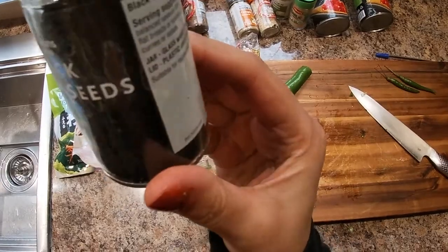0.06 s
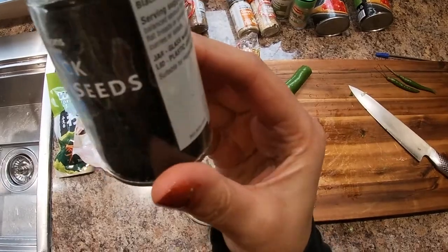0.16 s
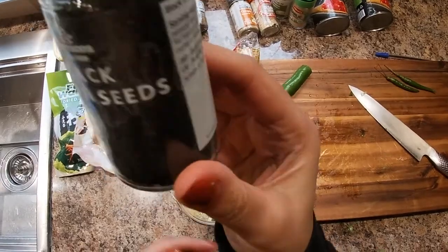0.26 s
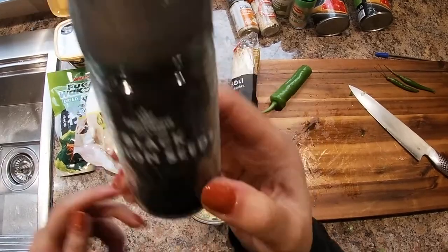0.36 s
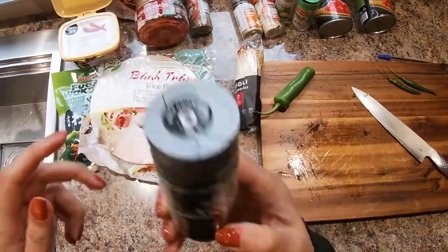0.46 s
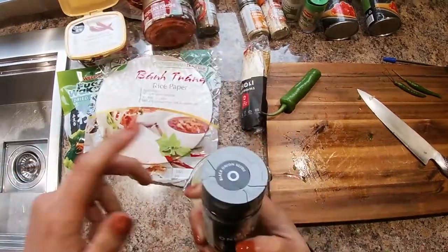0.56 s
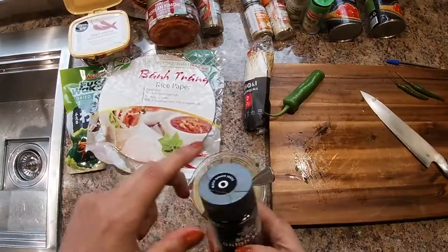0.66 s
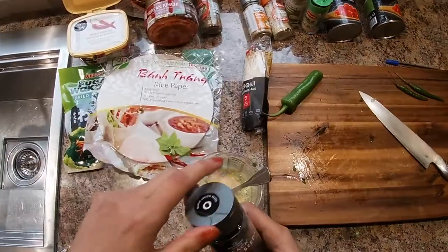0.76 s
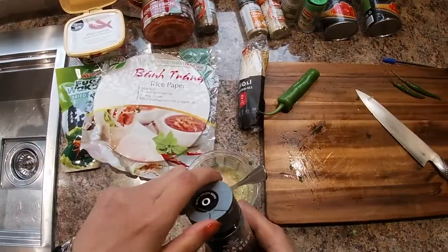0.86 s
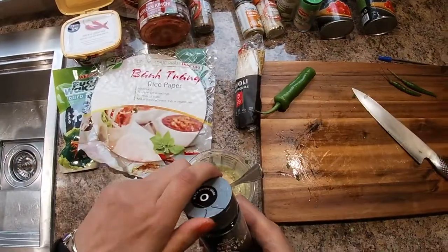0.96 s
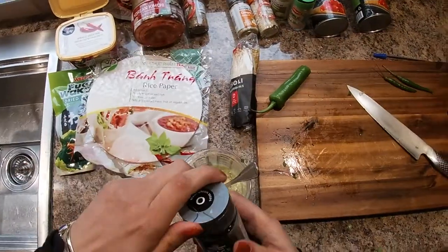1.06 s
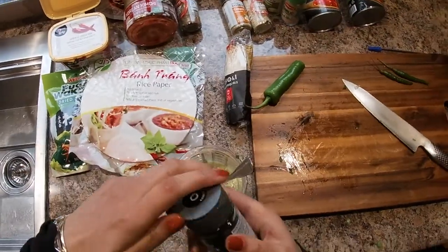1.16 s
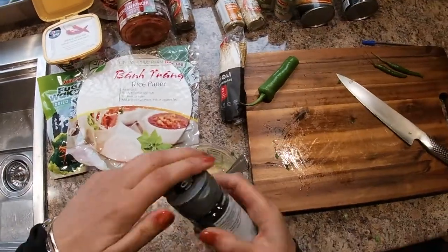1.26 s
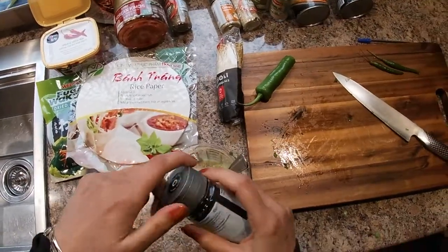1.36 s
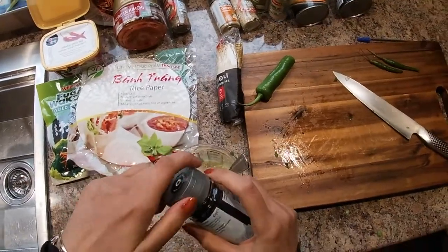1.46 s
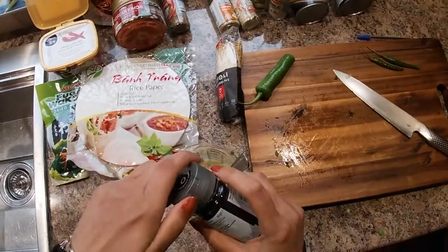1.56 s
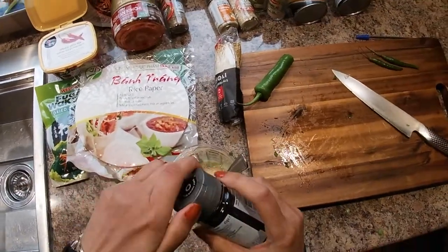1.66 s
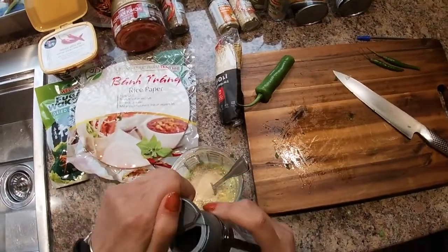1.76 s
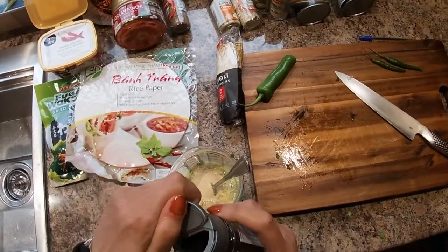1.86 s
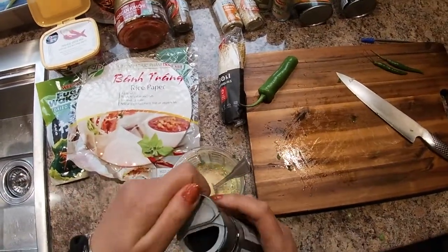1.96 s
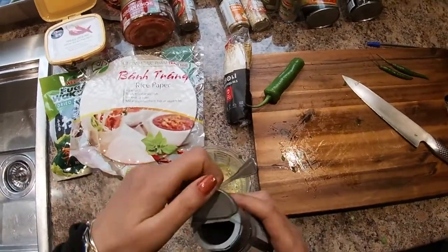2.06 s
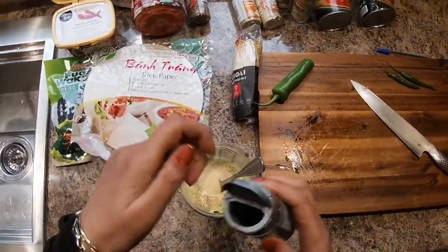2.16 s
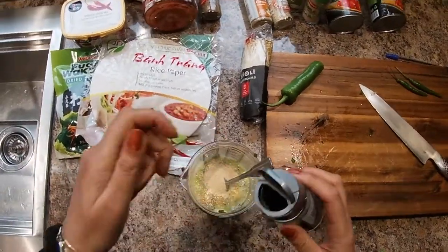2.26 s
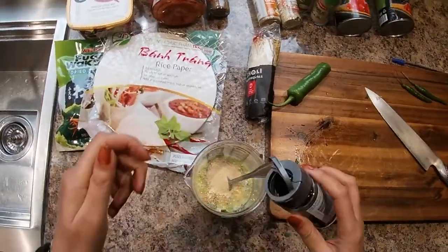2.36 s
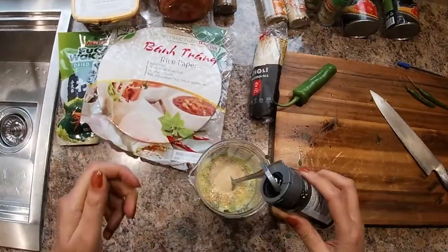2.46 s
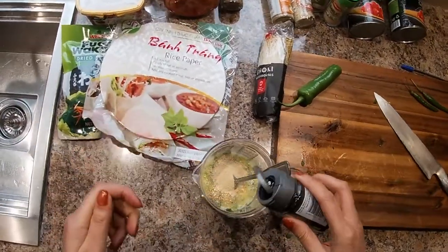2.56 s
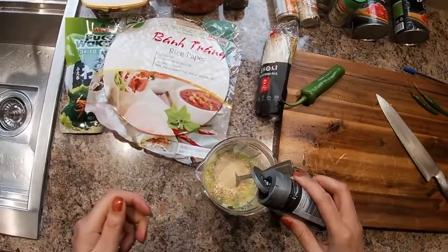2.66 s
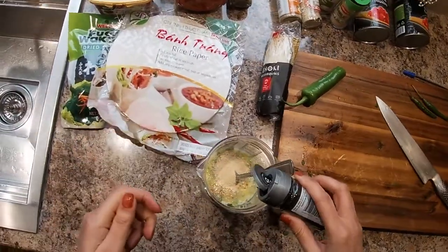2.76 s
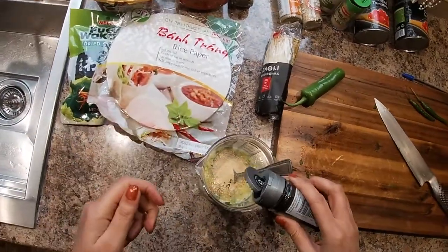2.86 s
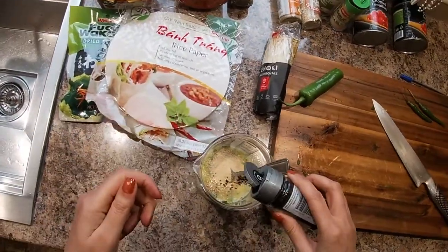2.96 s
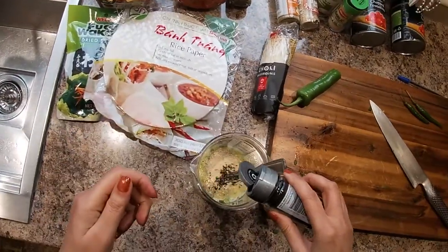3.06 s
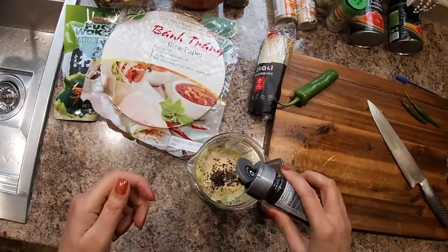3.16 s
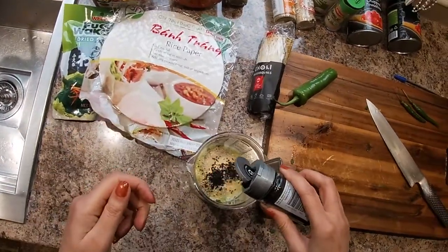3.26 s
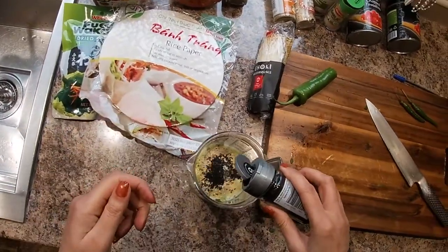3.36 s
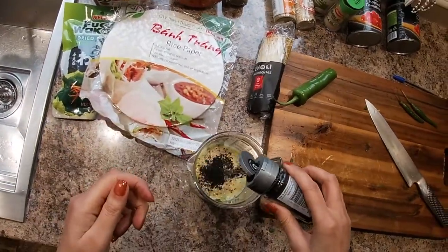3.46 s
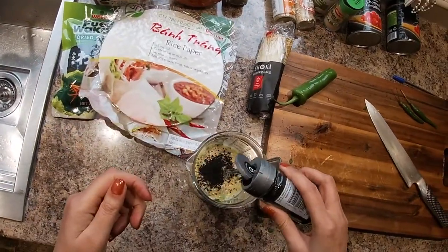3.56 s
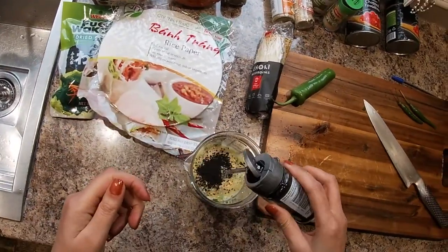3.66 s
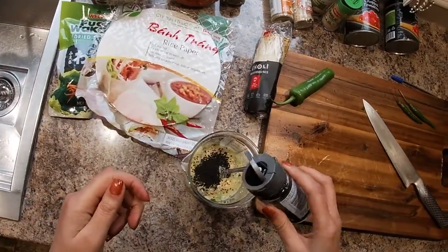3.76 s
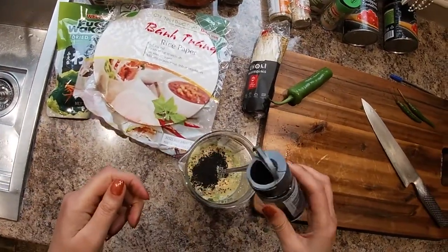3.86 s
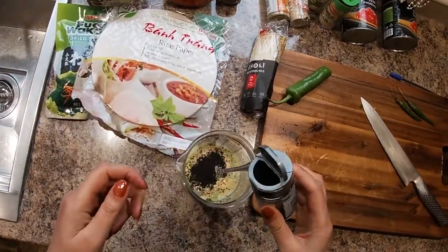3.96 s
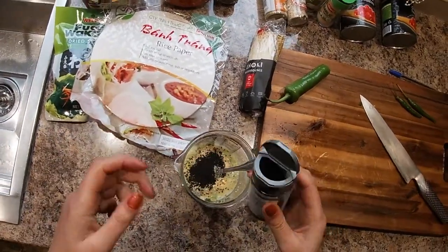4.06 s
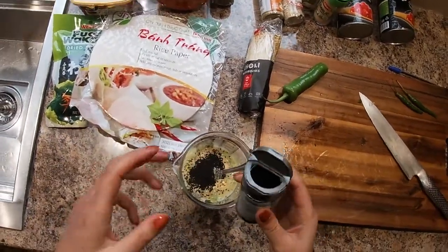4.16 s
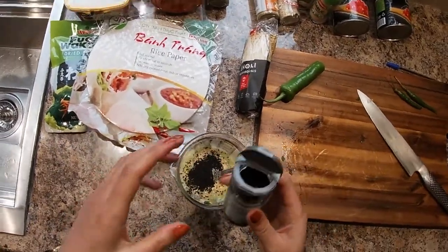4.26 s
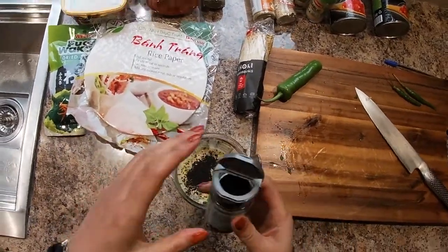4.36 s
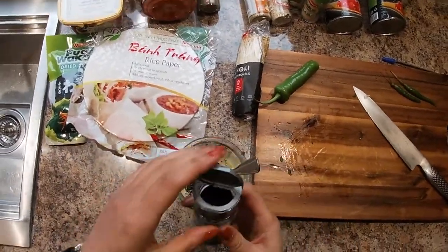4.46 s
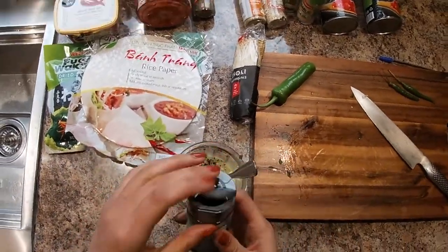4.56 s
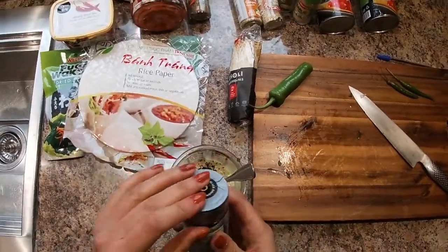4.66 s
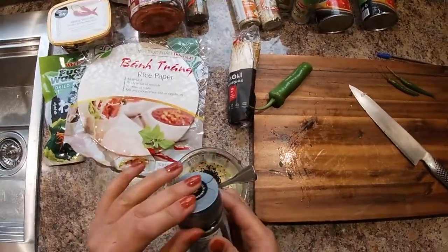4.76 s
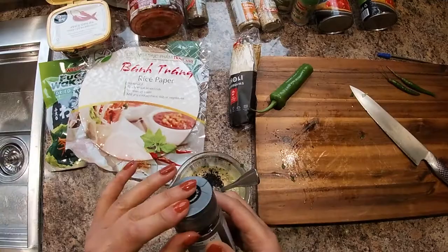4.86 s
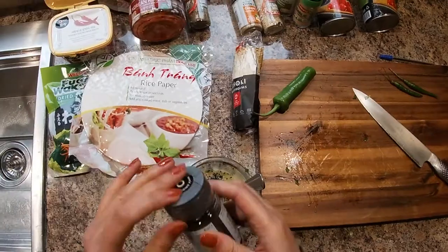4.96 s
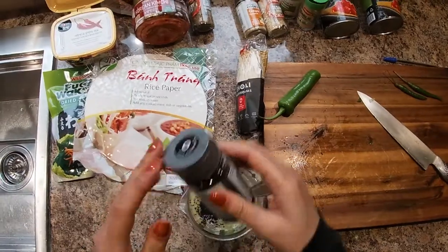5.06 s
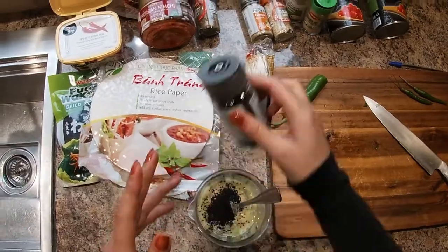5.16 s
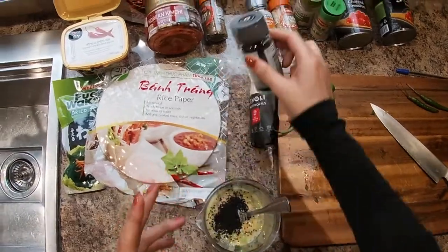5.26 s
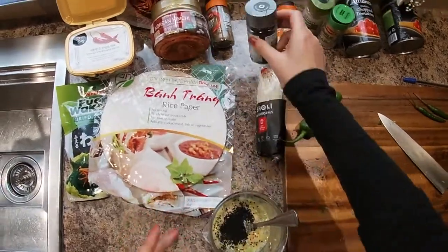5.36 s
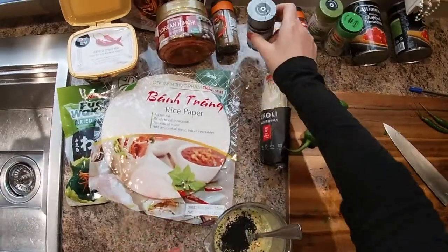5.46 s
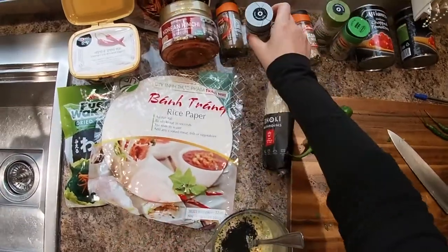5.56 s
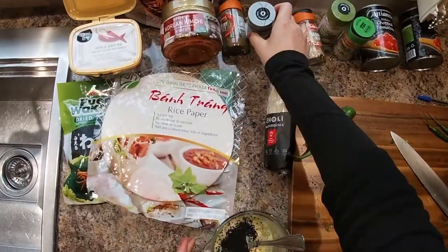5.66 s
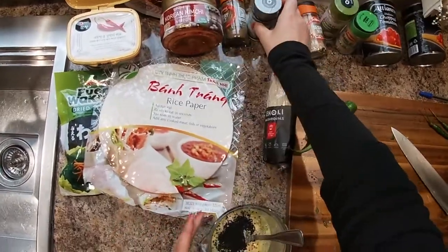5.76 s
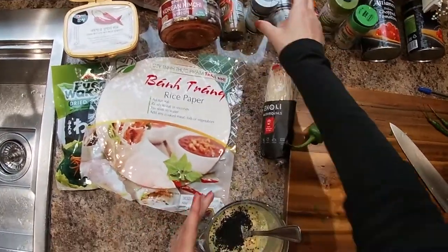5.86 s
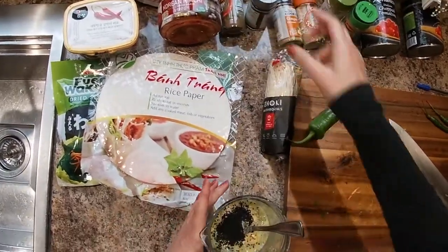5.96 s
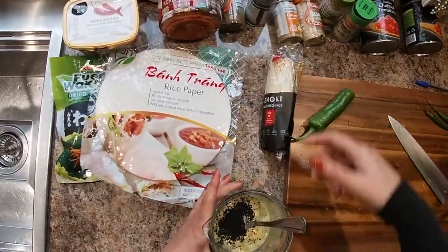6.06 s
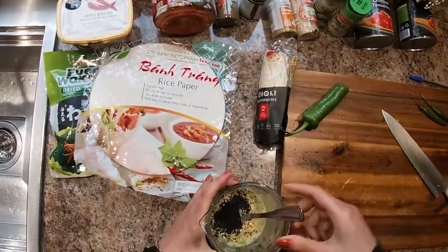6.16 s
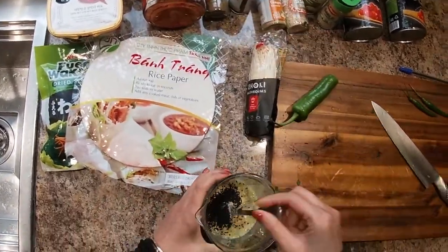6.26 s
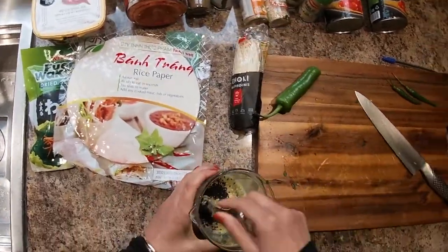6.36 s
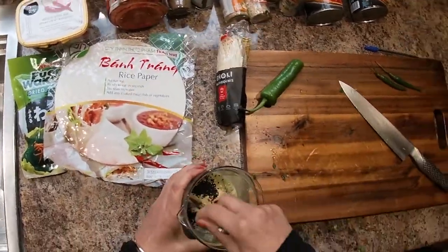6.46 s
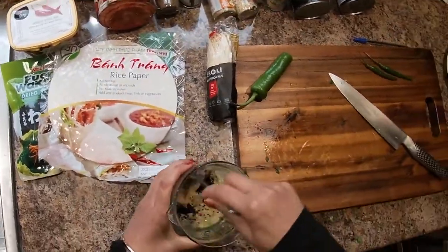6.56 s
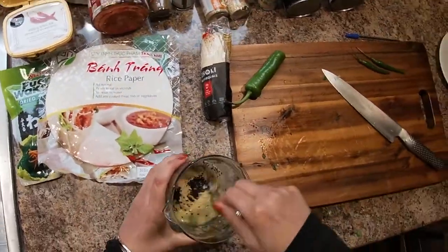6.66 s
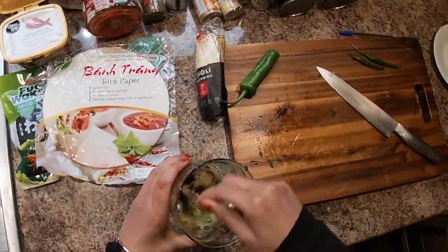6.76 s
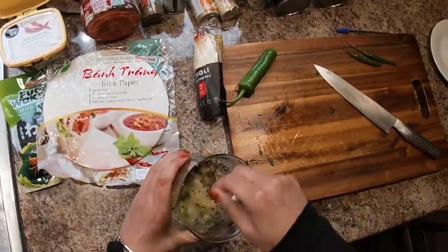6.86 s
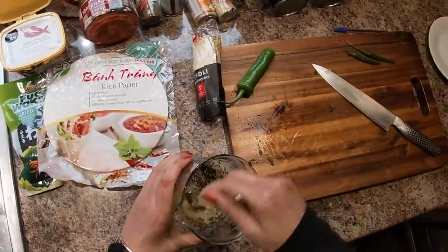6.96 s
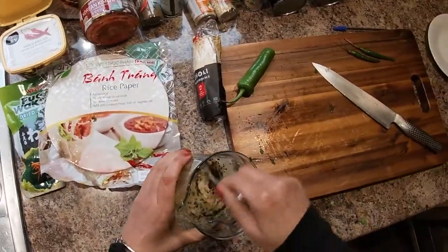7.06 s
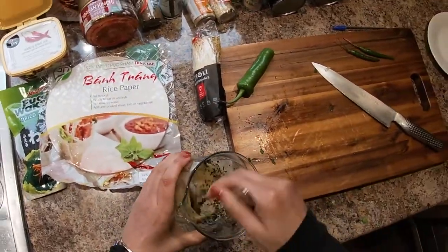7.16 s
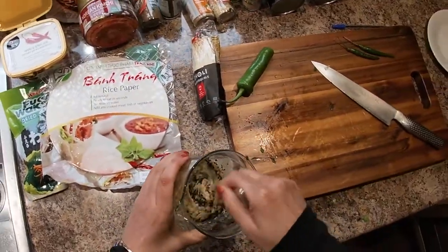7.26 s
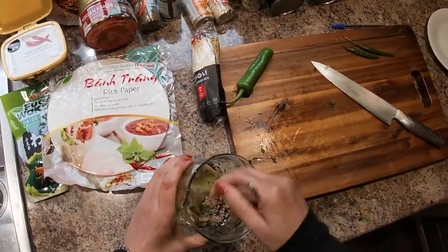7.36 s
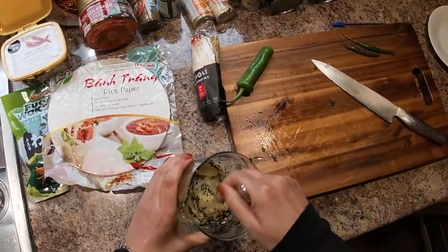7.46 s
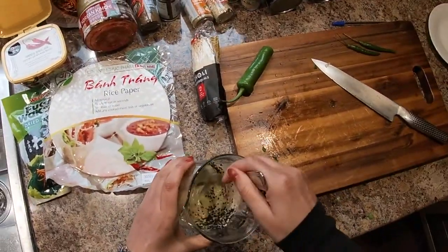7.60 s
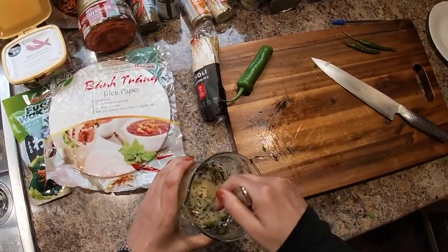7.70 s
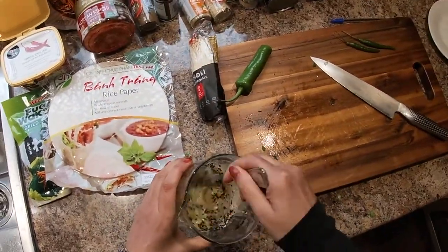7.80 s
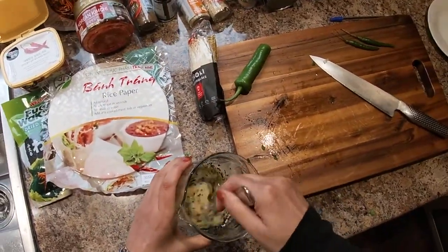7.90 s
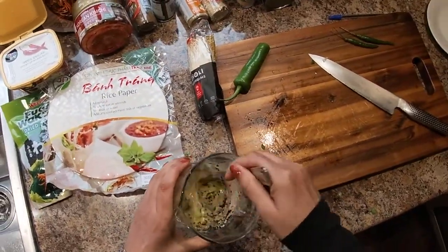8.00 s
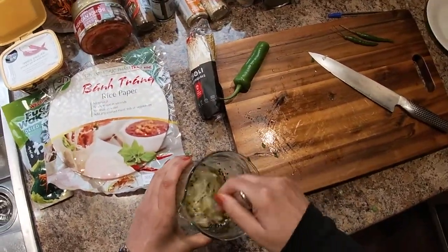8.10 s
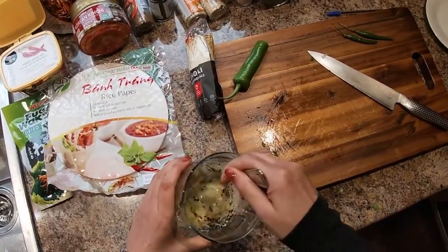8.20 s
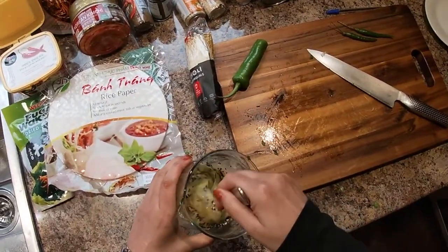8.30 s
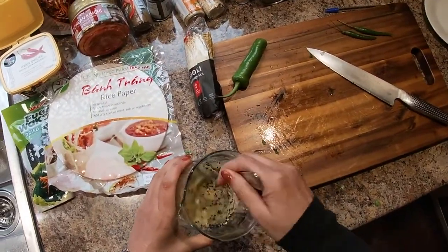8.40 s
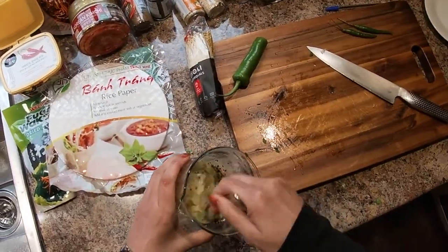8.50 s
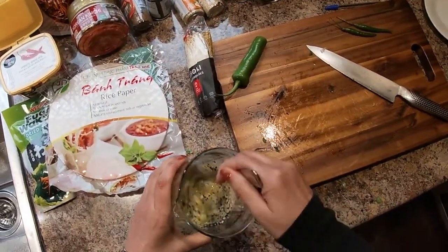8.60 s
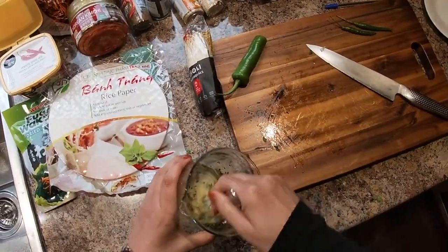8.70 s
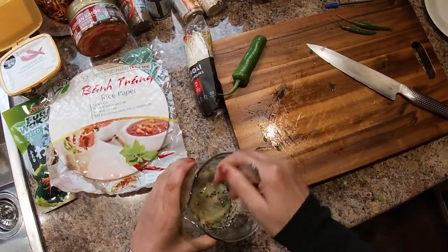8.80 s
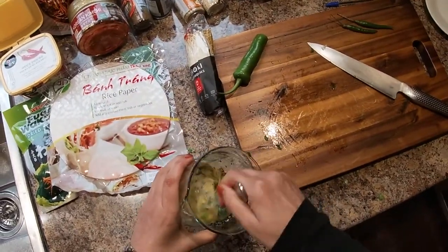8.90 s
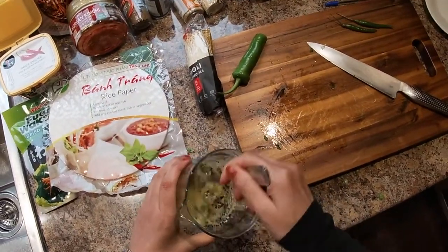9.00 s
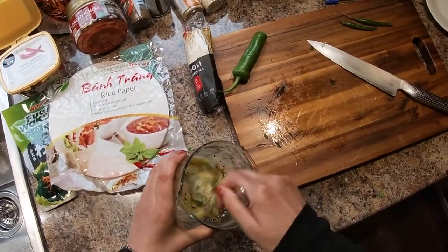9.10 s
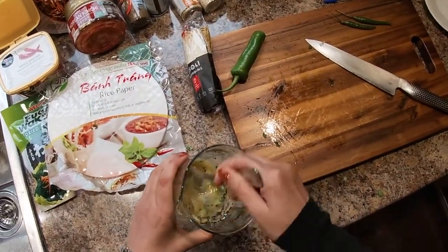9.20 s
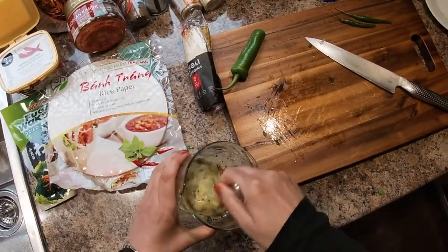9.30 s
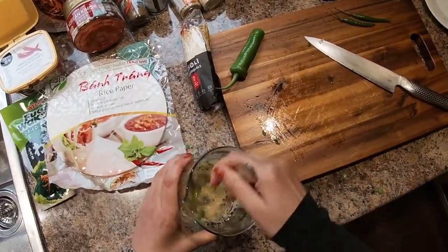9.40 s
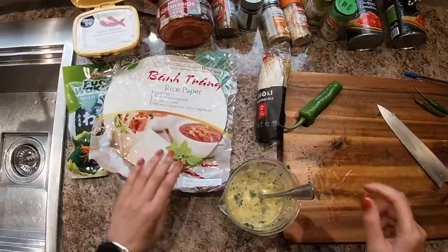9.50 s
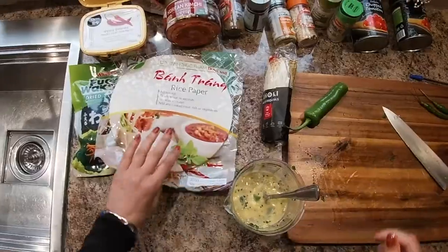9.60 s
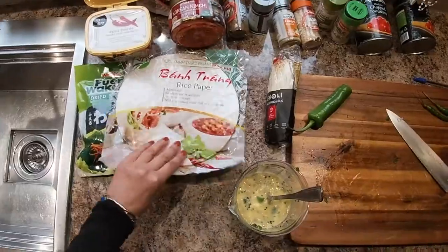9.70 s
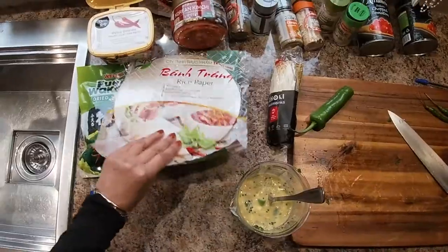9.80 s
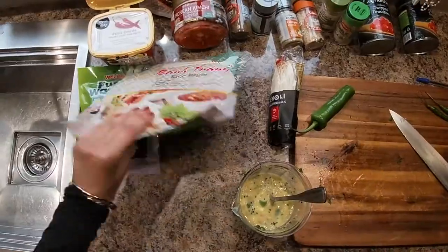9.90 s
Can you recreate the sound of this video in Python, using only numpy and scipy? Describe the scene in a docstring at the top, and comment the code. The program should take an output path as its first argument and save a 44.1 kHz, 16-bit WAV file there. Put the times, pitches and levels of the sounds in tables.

```python
"""A metal spoon beats a gulping egg mixture in a small glass bowl: struck modes of hollow, wall and steel,
filtered tiny slips for the rubbing, tones of rising pitch for air pockets. Before that, close up, a spice jar's
flip lid pops (noise bursts and modes), seeds trickle in (a tick each), the lid snaps and the jar is put back.
At the end something hard clacks down with a short rattle. Fingers rub, thin squeaks slide, a fridge hums,
the room rings (decaying noise), and gain control ducks after the loudest peaks."""
import sys
import numpy as np
from scipy import signal
from scipy.fft import rfft, irfft, next_fast_len
from scipy.io import wavfile
from scipy.ndimage import uniform_filter1d, minimum_filter1d, map_coordinates

SR = 44100
rng = np.random.default_rng(int(sys.argv[2]) if len(sys.argv) > 2 else 0)


def transcribe(u):
    """Save the signal u as a 16-bit wav file named by the first command-line argument.

    u: samples, shape (n,) or (channels, n), limited to [-1, 1]; the rate is SR.
    q: integer samples, one column per channel.
    """
    v = np.clip(np.atleast_2d(u).T, -1, 1)
    q = np.round(v * 32767).astype(np.int16)
    wavfile.write(sys.argv[1], SR, q)


N = 438354
CLOCK = np.arange(N) / SR
AGE = np.arange(SR // 4) / SR  # time since a contact, s

# spoon blows: [t/s, hollow level/dB, glass wall level/dB, steel level/dB, tip tick level/dB, wall f/Hz, steel f/Hz]
SPOON_BLOWS = [(6.3398, -42, -60.5, -73, -86, 1760, 6270), (6.3757, -56.5, -75, -69.5, -81, 1870, 5650),
               (6.5177, -44.5, -59, -68.0, -87, 1910, 4940), (6.6068, -66, -55, -57, -76, 3140, 3570),
               (6.6305, -38, -39.5, -40.0, -59.5, 2690, 3610), (6.6698, -44, -44.5, -46.5, -66, 2830, 3460),
               (6.7315, -30.5, -31.0, -27, -48.5, 2286, 4040), (6.8093, -41.5, -37, -46, -67, 2870, 5100),
               (6.8488, -39.0, -57, -50, -82, 2440, 5430), (7.0306, -50, -37.5, -44.5, -59, 2560, 3810),
               (7.107, -29, -19.5, -23.5, -38.5, 2330, 4680), (7.3713, -45.5, -41, -48, -61, 1820, 3470),
               (7.4182, -43.5, -45.5, -50, -69, 2470, 3690), (7.5172, -46, -48.5, -49.0, -64, 2770, 4020),
               (7.5442, -45, -33, -37, -43.5, 1740, 4740), (7.7178, -47, -44.5, -48, -62, 2255, 5330),
               (7.7442, -36, -44.0, -45.5, -52.5, 1829, 5790), (7.8092, -45.5, -50, -48, -74, 2500, 4880),
               (7.8937, -46.5, -50.5, -52, -60, 1520, 4070), (7.9246, -47.5, -49.5, -47.0, -57, 2330, 4590),
               (8.0632, -49, -46.5, -43.5, -52, 2310, 5470), (8.0992, -11, -17, -17.5, -25, 2280, 4590),
               (8.5335, -42, -40, -41, -49.5, 2925, 5490), (8.6538, -62, -44, -49, -55, 2690, 5350),
               (8.723, -32.5, -29.5, -26.5, -36.5, 2285, 5050),
               (8.7602, -36.5, -43.5, -48, -39, 2270, 5480), (8.7986, -43.5, -51.5, -47, -55, 2330, 5190),
               (8.8662, -43, -45, -45, -52, 2070, 4880), (8.9268, -30.5, -29.5, -26, -31.5, 2360, 4590),
               (8.9599, -44, -42, -50, -47, 2540, 5160), (9.0408, -50, -44, -48.0, -53.5, 2800, 3400),
               (9.1029, -52, -52, -48, -63, 1807, 3350), (9.1364, -27, -26, -25.5, -30.5, 1710, 4760),
               (9.1632, -49.5, -37, -37.5, -44.5, 1930, 5670), (9.2806, -55, -41.0, -47, -48, 2120, 5520),
               (9.3349, -30, -26, -23, -32, 2095, 4070), (9.3556, -36.5, -38.5, -40.5, -49, 1867, 5360),
               (9.3722, -35.5, -31.5, -25.0, -34, 2030, 4350)]
# spectrum of steel skidding on glass, also of the wet crackle: [f/Hz, level/dB]
CONTACT_SPECTRUM = [(100, -21.5), (250, 21.5), (450, 5), (900, 2.5), (1400, 9), (2000, 17), (3500, 12.5),
                    (5200, 12.5), (6600, 1), (7800, 0), (9000, -1), (10000, -11.5), (12000, -8.5),
                    (13500, -17), (16000, -52.5)]
# clumps of seeds landing: [t/s, level/dB, treble tilt/dB]
SEED_CLUMPS = [(2.89, -61, -13), (2.998, -57, -6.5), (3.009, -65, -6), (3.110, -61.5, -3),
               (3.139, -58.5, -7), (3.177, -63, -12), (3.267, -62, 2), (3.374, -62, 2), (3.417, -65, 7),
               (3.516, -58.5, -3), (3.535, -58, -4), (3.602, -68, -4), (3.625, -66, 3), (3.668, -61, -4),
               (3.785, -62, 5)]
STIR_START_S, STIR_STOP_S = 7.2, 9.45
SLIDE_PEAK_S, SLIDE_FALL_S = 3.768, 0.53  # jar righted, seeds slide back; fall is a 1/e time


def amp(db):
    """Decibels to gain."""
    return 10 ** (np.asarray(db) / 20)


def unit(x):
    """Scale to rms 1."""
    return x / np.sqrt(np.mean(x ** 2) + 1e-20)


def blow(x):
    """Scale a hit to the energy of 20 ms at rms 1."""
    return x * np.sqrt(.02 * SR / np.sum(x ** 2))


def along(points, hz):
    """Interpolate (Hz, value) points on a log frequency axis."""
    f, v = np.transpose(points)
    return np.interp(np.log(hz + 1), np.log(f + 1), v)


def add(track, s, x):
    """Mix x into the track at time s."""
    start = round(s * SR)
    track[start:start + len(x)] += x[:N - start]


def colour(x, points, size=4096):
    """Minimum-phase filter (folded cepstrum) with the gain of (Hz, dB) points."""
    cepstrum = irfft(np.log(amp(along(points, np.fft.rfftfreq(size, 1 / SR)))))
    cepstrum[1:size // 2] *= 2
    cepstrum[size // 2 + 1:] = 0
    response = irfft(np.exp(rfft(cepstrum)))
    return signal.fftconvolve(x, response)[:len(x)]


def brighter(points, bright_db):
    """The same spectrum with its treble raised or lowered."""
    return [(hz, db + along([(2000, 0), (7000, bright_db)], hz)) for hz, db in points]


def wobble(rate, count=2000):
    """Smooth random curve with rate knots per second."""
    return map_coordinates(rng.standard_normal(count), [CLOCK * rate], mode="wrap")


def swell(peak_s, rise_s, fall_s):
    """Gaussian rise and fall around a peak; the times reach 1/e."""
    since = CLOCK - peak_s
    return np.exp(-(since / np.where(since < 0, rise_s, fall_s)) ** 2)


def ring(modes, scatter_db, detune=0., age=AGE):
    """Damped modes; each contact point draws new strengths, signs and slightly new pitches."""
    hz, db, t60 = np.transpose(modes)[:, :, None]
    hz = hz * np.exp(detune * rng.standard_normal(hz.shape))
    sign = rng.choice([-1, 1], hz.shape)
    strength = sign * amp(db + scatter_db * rng.standard_normal(hz.shape))
    return np.sum(strength * amp(-60 * age / t60) * np.sin(2 * np.pi * hz * age), axis=0)


def knock(spectrum, t60, rattle_db):
    """One sharp push plus a dense, dying rattle of noise."""
    rattle = blow(rng.standard_normal(len(AGE)) * amp(-60 * AGE / t60))
    push = blow(1.0 * (AGE == 0))
    return blow(colour(amp(rattle_db) * rattle + push, spectrum))


def grains(rate, spread_db):
    """Random tiny impacts, rate per second, of unequal size, rms 1."""
    chance, size, sign = rng.random(N), rng.standard_normal(N), rng.choice([-1, 1], N)
    return unit((chance < rate / SR) * sign * amp(spread_db * np.clip(size, -2, 2)))


def even(x, fine_hz, broad_hz):
    """Level out chance spectral peaks and holes, keeping the broad colour."""
    size = next_fast_len(2 * len(x))
    z = rfft(x, size)
    power = np.abs(z) ** 2
    fine, broad = [np.abs(uniform_filter1d(power, size=round(hz * size / SR))) + 1e-20
                   for hz in (fine_hz, broad_hz)]
    return irfft(z * np.sqrt(broad / fine), size)[:len(x)]


def kitchen(x, wet_db, build=0.00038, linger=1):
    """x plus a diffuse room tail: noise that builds up and decays at each frequency's own speed."""
    # room decay: [f/Hz, t60/s]
    room_t60 = [(150, 0.45), (400, 0.71), (1000, 0.72), (2800, 0.58), (5000, 0.53), (8000, 0.51),
                (13000, 0.27)]
    # room colour: [f/Hz, level/dB]
    room_tone = [(80, -13.5), (190, 2.5), (250, 9), (320, 8.5), (500, -1.5), (1000, 4), (3000, 1.5),
                 (8000, 6.5), (13000, 6)]
    hz, t, z = signal.stft(rng.standard_normal(3 * SR // 4), SR, nperseg=256)
    decay_db = -60 * t / linger / along(room_t60, hz)[:, None]
    shape = amp(along(room_tone, hz)[:, None] + decay_db)
    tail = signal.istft(z * shape, SR, nperseg=256)[1]
    tail *= (1 - np.exp(-np.arange(len(tail)) / SR / build)) ** 2
    tail = even(tail, fine_hz=40, broad_hz=300)
    response = amp(wet_db) * tail / np.linalg.norm(tail)
    response[0] = 1  # direct sound
    return signal.fftconvolve(x, response)


def beating():
    """Blows, grazes, rubbing and air pockets; at the stop the sound turns dull within 15 ms."""
    sound = spoon() + taps() + stirring() + plops()
    dull = colour(sound, [(900, 5.0), (1400, -3.0), (2200, -11.5), (5000, -23.0), (9000, -25.0)])
    bright = np.clip((STIR_STOP_S - CLOCK) / 0.015 + .5, 0, 1)
    return bright * sound + (1 - bright) * dull


def spoon():
    """Firm blows of the spoon against the bowl."""
    out = np.zeros(N)
    for s, *levels_db, wall_hz, steel_hz in SPOON_BLOWS:
        add(out, s, strike(levels_db=levels_db, s=s, wall_hz=wall_hz, steel_hz=steel_hz))
    return out


def strike(s, levels_db, wall_hz, steel_hz):
    """One contact rings hollow, glass wall and steel; where they meet decides which pitches stand out."""
    # bowl's hollow: [f/Hz, level/dB, t60/s]
    hollow_modes = [(462, -8.5, 0.085), (629, -4, 0.039), (723.5, 7, 0.044), (910, -22, 0.021),
                    (1000, -21, 0.0084)]
    # glass wall with the spoon against it: [f/Hz, level/dB, t60/s]
    wall_modes = [(1906, -7, 0.048), (2210, -9.5, 0.011), (2312, 2.5, 0.01), (2690, -7, 0.076),
                  (3123, 4, 0.013), (3870, 9, 0.0028), (4030, -20, 0.0037), (4490, -5, 0.0059),
                  (5330, 6, 0.011), (5757, -1.5, .018), (6590, -4, 0.011), (7500, 1.5, 0.0098),
                  (8200, -2.5, 0.0049)]
    # mixture loads the bowl, frees it as it loosens: [t/s, hollow pitch ratio]
    loosening = [(6.3, 0.94), (6.75, 0.93), (7.1, 0.96), (7.6, 0.98)]
    # a small bowl radiates little bass: [f/Hz, level/dB]
    radiation = [(40, -50.5), (120, -17), (250, -12.5), (380, -16), (560, -4), (1000, 2.5), (9000, 2.5),
                 (16000, -2.5)]
    bend = np.interp(s, *np.transpose(loosening)) * np.exp(0.012 * rng.standard_normal())
    bent_modes = [(hz * bend, db, t60) for hz, db, t60 in hollow_modes]
    hollow = blow(ring(bent_modes, scatter_db=1.0) * (1 - np.exp(-AGE / 0.00058)))
    glass = blow(ring(wall_modes, scatter_db=2.5, detune=.02))
    # the two pitches this contact favours
    wall = blow(ring([(wall_hz, 0, 0.032)], scatter_db=0))
    steel = blow(ring([(steel_hz, 0, 0.017)], scatter_db=0))
    hit = amp(8) * hollow + glass + amp(0.5) * wall + amp(-3) * steel + amp(4) * chatter(t60=0.054)
    return kitchen(voiced(colour(hit, radiation), levels_db), wet_db=-2.0, build=0.001)


def chatter(t60, click_db=-12, rise=0.0021):
    """A light first touch, then a dying noise of steel skidding roughly over glass."""
    skid = blow(rng.standard_normal(len(AGE)) * amp(-60 * AGE / t60) * (1 - np.exp(-AGE / rise)))
    touch = blow(1.0 * (AGE == 0))
    return blow(colour(skid + amp(click_db) * touch, CONTACT_SPECTRUM))


def voiced(x, levels_db):
    """Filter a blow to bring each of its registers near its level."""
    # edges of hollow, glass wall, steel, tip tick: [f/Hz]
    register_edges = [480, 1200, 3200, 6500, 12000]
    power, hz = np.abs(rfft(x)) ** 2, np.fft.rfftfreq(len(x), 1 / SR)
    points = []
    for low, high, db in zip(register_edges, register_edges[1:], levels_db):
        energy = 2 * power[(hz > low) & (hz < high)].sum() / len(x)
        gain_db = db - 10 * np.log10(energy / (.02 * SR))  # re 20 ms at rms 1
        points += [(low * 1.06, gain_db), (high / 1.06, gain_db)]
    return colour(x, points)


def taps(count=10, tip_db=-14):
    """The spoon grazes the glass very lightly, at one random moment in each equal slot."""
    hollow_db, tap_db, spread_db = -55, -56, 3
    out = np.zeros(N)
    for k in range(count):
        s = STIR_START_S + (STIR_STOP_S - STIR_START_S) * (k + rng.random()) / count
        db = spread_db * rng.uniform(-1, 1)
        pitches = SPOON_BLOWS[rng.integers(len(SPOON_BLOWS))][-2:]
        levels_db = db + np.array([hollow_db, tap_db, tap_db, tap_db + tip_db])
        add(out, s, strike(s, levels_db, *pitches))
    return out


def stirring():
    """Steel rubs glass and seeds in tiny slips, sings in scratches, drags after blows; the wet mix crackles."""
    # rub: [f/Hz, level/dB]
    rub_spectrum = [(100, -12.5), (280, -3), (500, 10), (720, -6.5), (1050, 4), (1700, 2), (2350, 1.5),
                    (3300, 0), (5400, -8), (6400, -1.5), (8000, -27), (10000, -18), (13000, -24),
                    (16000, -51)]
    # rubbed spoon: [f/Hz, level/dB, t60/s]
    steel_modes = [(2430, -1.5, .03), (2790, -4.5, .025), (5160, 2.5, 0.021), (5500, -2, .02)]
    rub_db, crackle_db = -60, -88.5
    scratch_db, scratch_surge_db = -1.5, 5  # level re rub, unevenness
    drag_db, drag_peak_s = -21.5, 0.06  # level re the blow's steel, time to peak
    moving = (CLOCK > STIR_START_S) & (CLOCK < STIR_STOP_S)
    pressure = amp(rub_db) * moving
    rise = np.arange(SR // 2) / SR / drag_peak_s
    for s, _, _, steel_db, *_ in SPOON_BLOWS:
        add(pressure, s, amp(steel_db + drag_db) * rise * np.exp(1 - rise))
    rub = unit(colour(grains(rate=900, spread_db=5), rub_spectrum))
    slips = grains(rate=500, spread_db=5) * amp(scratch_surge_db * wobble(30))
    scratch = amp(scratch_db) * unit(signal.fftconvolve(slips, ring(steel_modes, scatter_db=1))[:N])
    crackle = unit(colour(grains(rate=160, spread_db=7), CONTACT_SPECTRUM))
    return kitchen(pressure * (rub + scratch) + amp(crackle_db) * moving * crackle, wet_db=-7.0)[:N]


def plops():
    """Air pockets close in the wet mixture, and the runny egg gulps back behind the spoon."""
    # clear pockets: [t/s, starting f/Hz, level/dB]
    pockets = [(6.752, 600, -42), (6.785, 686, -38.5), (8.675, 1620, -44), (8.762, 586, -37),
               (8.8, 560, -38), (9.36, 1820, -38)]
    # gulps: [t/s, starting f/Hz, level/dB]
    gulps = [(6.339, 248, -51.5), (6.517, 276, -48), (6.631, 244, -57), (7.372, 257, -44.5),
             (7.548, 198, -44.5), (7.745, 211, -42.5), (8.533, 176, -46.5), (8.758, 192, -43),
             (8.963, 166, -47.5), (9.163, 241, -36.5), (9.356, 197, -38.5), (9.454, 177.5, -65)]
    out = np.zeros(N)
    for s, hz, db in pockets:
        add(out, s, kitchen(amp(db) * bubble(hz, t60=0.022), wet_db=-1.5))
    for s, hz, db in gulps:
        add(out, s, kitchen(amp(db) * bubble(hz, t60=0.063, glide=36), wet_db=-0.5))
    return out


def bubble(hz, t60, glide=4):
    """An air pocket rings briefly and rises in pitch as it closes."""
    # instantaneous pitch: hz * (1 + 2 * glide * age)
    tone = np.sin(2 * np.pi * hz * AGE * (1 + glide * AGE))
    tone = tone * amp(-60 * AGE / t60) * (1 - np.exp(-AGE / 0.0024))
    return blow(colour(tone, [(70, -26.0), (200, 1.5)]))


def counter_knocks():
    """Hard blows rock the bowl: base knocks, counter shudders; later something hard clacks down and rattles."""
    # rocking: [t/s, shudder level/dB, base knock level/dB]
    shudders = [(7.107, -56, -33.5), (8.103, -41, -38.5)]
    # counter shudder: [f/Hz, level/dB, t60/s]
    shake_modes = [(16.4, 17.5, 0.32), (42, 16.5, 0.31), (82, -8, 0.25), (125, 21.5, 0.033)]
    # glass base on the worktop: [f/Hz, level/dB]
    base_spectrum = [(60, -13.5), (150, -24), (300, -22.5), (400, -28.5), (480, -1.5), (600, 4.5),
                     (735, 3.5), (860, -9), (1000, 1.5), (1300, -15), (3000, -28), (12000, -61)]
    # clacks and rattle: [t/s, level/dB, treble tilt/dB]
    clacks = [(9.7251, -26, 1), (9.7353, -41.5, -19), (9.7682, -33.5, 2), (9.775, -30, 8.5),
              (9.779, -30.5, 9.5), (9.83, -43, -7), (9.911, -41.5, 8)]
    # hard object on the counter: [f/Hz, level/dB]
    clack_spectrum = [(59, -31), (100, -9.5), (200, -10), (350, 3.5), (650, 1.5), (1000, 3.5), (1120, 1),
                      (1270, 4.5), (1450, 2), (2200, 1), (2620, 4.5), (3400, -3), (4200, -6.5), (5100, -12),
                      (7200, -19), (8950, -29.5), (12000, -31.5), (15500, -40)]
    out = np.zeros(N)
    for s, shudder_db, knock_db in shudders:
        add(out, s, amp(shudder_db) * ring(shake_modes, scatter_db=0))
        base = knock(base_spectrum, t60=.04, rattle_db=12)
        add(out, s, kitchen(amp(knock_db) * base, wet_db=4, build=.025))
    for s, db, bright_db in clacks:
        clack = knock(brighter(clack_spectrum, bright_db), t60=0.021, rattle_db=10.5)
        add(out, s, kitchen(amp(db) * clack, wet_db=1.5))
    return out


def lid():
    """The plastic catch snaps and the jar's hollow pops: coloured knocks, plus modes in the pop."""
    # lid moves: [t/s, hollow pop level/dB, plastic snap level/dB]
    lid_moves = [(1.2744, -93, -65), (1.7823, -36.5, -57), (1.7905, -25.5, -35.5), (2.146, -71, -64),
                 (2.197, -90, -64.5), (4.6947, -40, -46), (4.7398, -51, -14.5), (5.15, -98.5, -59.5)]
    # hollow pop: [f/Hz, level/dB]
    pop_spectrum = [(100, -25.5), (190, -19), (265, 7), (360, -8), (460, 2.5), (630, 1.5), (850, -6.5),
                    (1500, -9), (2500, -8), (3500, -16.5), (5300, -14), (7500, -37), (12000, -46)]
    # plastic snap: [f/Hz, level/dB]
    snap_spectrum = [(100, -25.5), (900, -26), (2200, -18.5), (3000, -10), (4800, -10), (7500, -13.5),
                     (10000, -23.5), (13000, -40), (16000, -49)]
    # lid's catch: [f/Hz, level/dB, t60/s]
    catch_modes = [(560, -4, 0.04), (2380, 2.5, 0.047), (3230, 0.5, 0.026), (7970, -8.5, 0.031)]
    out = np.zeros(N)
    for s, pop_db, snap_db in lid_moves:
        pop = knock(pop_spectrum, t60=.035, rattle_db=-12)
        pop = pop + amp(-11) * blow(ring(catch_modes, scatter_db=2.5))
        snap = knock(snap_spectrum, t60=.03, rattle_db=-9)
        add(out, s, kitchen(amp(pop_db) * pop, wet_db=-1.0, linger=0.88))
        add(out, s, kitchen(amp(snap_db) * snap, wet_db=-2.0, linger=0.84))
    return out


def seeds():
    """Seeds patter and clump into the drumming bowl as the jar tips; as it rights, the rest slide back inside."""
    # seeds landing: [f/Hz, level/dB]
    seed_spectrum = [(200, -3), (600, -7), (760, 12), (900, 3.5), (1600, -1.5), (2300, 7.5), (3500, 3),
                     (5500, 6), (8000, 4), (9500, -1.5), (11000, -11), (13000, -32), (16000, -54)]
    # bowl under the falling seeds: [f/Hz, level/dB]
    drum_spectrum = [(300, -24.5), (620, -15.5), (760, -0.5), (900, -10), (2300, -14), (6000, -24)]
    # seeds sliding inside the jar: [f/Hz, level/dB]
    slide_spectrum = [(150, 1), (340, 9), (440, 15), (600, 6), (900, 10.5), (1500, 4), (2500, 7.5),
                      (4000, 6), (6800, 6), (8200, -8.5), (14000, -28.5)]
    pour_peak_s, pour_rise_s, pour_fall_s, pour_db = 3.56, 0.51, 0.32, -64  # jar tipped furthest
    drum_peak_s, drum_db = 3.49, -64  # earlier: the bowl answers most while bare of seeds
    surge_db, surges_per_s = 2, 14
    slide_rise_s, slide_db = 0.12, -59
    ticks = colour(patter(), seed_spectrum)
    ticks /= np.std(ticks[np.abs(CLOCK - pour_peak_s) < pour_rise_s])
    flow = swell(pour_peak_s, pour_rise_s, pour_fall_s) * amp(surge_db * wobble(surges_per_s))
    out = amp(pour_db) * flow * ticks
    drum = unit(colour(grains(rate=1900, spread_db=8.0), drum_spectrum))
    out += amp(drum_db) * swell(drum_peak_s, pour_rise_s, pour_fall_s) * drum
    for s, db, bright_db in SEED_CLUMPS:
        add(out, s, amp(db) * knock(brighter(seed_spectrum, bright_db), t60=0.04, rattle_db=14))
    slide = unit(colour(grains(rate=2500, spread_db=5), slide_spectrum))
    out += amp(slide_db) * swell(SLIDE_PEAK_S, slide_rise_s, SLIDE_FALL_S) * slide
    return kitchen(out, wet_db=-1)[:N]


def patter(count=900):
    """Every seed lands with a tiny decaying tick of its own pitch and size."""
    median_hz, log_spread, t60_cycles, size_spread_db = 4200, 0.55, 14, 4
    out, age = np.zeros(N), AGE[:SR // 100]
    times = rng.uniform(SEED_CLUMPS[0][0], SLIDE_PEAK_S + SLIDE_FALL_S, count)
    pitches, sizes = rng.standard_normal((2, count)).clip(-2, 2)
    for s, pitch, size in zip(times, pitches, sizes):
        hz = median_hz * np.exp(log_spread * pitch)
        envelope = amp(size_spread_db * size - 60 * age * hz / t60_cycles)
        add(out, s, envelope * np.sin(2 * np.pi * hz * age))
    return out


def jar_put_back():
    """At arm's length the room is louder: a brush, a clink on a neighbour, then the heavy landing."""
    # brush, clink, landing: [t/s, level/dB]
    contacts = [(5.3263, -50.5), (5.6889, -39), (5.8048, -18)]
    # brush: [f/Hz, level/dB]
    brush_spectrum = [(300, -25), (2500, -20), (5000, -1), (8300, 3), (11000, -12), (16000, -22)]
    # neighbouring jar: [f/Hz, level/dB, t60/s]
    neighbour_modes = [(1720, 8, 0.041), (1856, 2, 0.07), (2200, -6, 0.025), (6820, -3, 0.023),
                       (7400, -13, 0.023)]
    # clink: [f/Hz, level/dB]
    clink_spectrum = [(120, -65), (200, -41), (300, -21.5), (540, -28), (700, -15), (1000, -19),
                      (1430, -17), (1700, -13.5), (1880, -2.5), (2150, -12.5), (2900, -14.5), (3600, -19),
                      (4470, -38), (5860, -33), (6900, -11.5), (8000, -25), (15000, -74)]
    # thud on the counter: [f/Hz, level/dB]
    thud_spectrum = [(24, -47), (40, -27), (80, -12), (130, -8), (200, -17.5), (250, -9.5), (313, -7),
                     (355, -8), (502, -9.5), (582, -12), (804, -3), (1530, -14), (1650, -11.5),
                     (2170, -26.5), (2920, -24.5), (3830, -36.5), (7490, -43.5), (15000, -84)]
    # worktop and what stands on it ring on: [f/Hz, level/dB, t60/s]
    worktop_modes = [(243, -13, 0.92), (342, -0.5, 0.99), (404, -12, 0.47), (582, -9.5, 1.3),
                     (820, -3, 0.78), (1034, 1, 0.45), (1082, -4, 0.37), (1360, -11, 0.41),
                     (1380, -6, 0.39), (1599, -3, 0.64), (1630, -10, 0.44), (1960, -24, 0.51)]
    brush = kitchen(knock(brush_spectrum, t60=0.061, rattle_db=0.0), wet_db=-2)
    glass = blow(ring(neighbour_modes, scatter_db=1))
    clink = kitchen(glass + amp(4.5) * knock(clink_spectrum, t60=0.024, rattle_db=21), wet_db=0.5)
    thud = knock(thud_spectrum, t60=.08, rattle_db=14)
    landing = kitchen(thud, wet_db=2.5, build=0.0059, linger=1.0)
    add(landing, 0, amp(-11) * ring(worktop_modes, scatter_db=0.5, age=CLOCK[:SR]))
    out = np.zeros(N)
    for (s, db), sound in zip(contacts, [brush, clink, landing]):
        add(out, s, amp(db) * sound)
    return out


def fingers(edge_db=-10, skirt_db=-48):
    """Fingers rub jar, lid and bowl: each stroke is a soft band of fine slips."""
    # strokes: [peak t/s, 1/e time/s, centre f/Hz, half width/octaves, level/dB]
    strokes = [(.05, 0.19, 3480, 0.83, -66.5), (0.588, 0.19, 1700, 1.8, -69.5), (0.9, 0.06, 1200, 1.4, -64),
               (0.897, .05, 5200, 0.66, -68), (1.275, 0.052, 5730, 0.73, -63),
               (1.276, 0.011, 3100, 0.12, -63), (1.474, 0.13, 8200, 0.3, -69.5),
               (2.182, 0.046, 4140, 1.1, -68), (3.715, 0.2, 256, 0.65, -65.5), (4.23, .03, 7500, 0.39, -68),
               (4.35, 0.046, 8200, 0.36, -70), (5.576, 0.15, 1500, 1.9, -69),
               (6.42, 0.48, 1540, 0.81, -66.5)]
    out = np.zeros(N)
    for s, length, hz, width, db in strokes:
        band = [(hz / 8 ** width, skirt_db), (hz / 2 ** width, edge_db), (hz, 0),
                (hz * 2 ** width, edge_db), (hz * 8 ** width, skirt_db)]
        slips = unit(colour(grains(rate=3000, spread_db=0.5), band))
        out += amp(db) * swell(s, length, length) * slips
    return out


def squeaks(waver_hz=75, waver_per_s=150):
    """Thin, faint sines swell, glide and fade, never quite steady in pitch."""
    # squeaks: [peak t/s, 1/e time/s, f at peak/Hz, glide/(Hz/s), level/dB]
    slides = [(.08, 0.1, 4200, -1500, -68.5), (.35, 0.37, 4950, -300, -76), (4.085, .04, 3590, -200, -65),
              (4.21, 0.045, 3550, -3000, -66), (4.29, 0.045, 3330, -600, -70),
              (4.425, .03, 3400, 2501, -69)]
    out = np.zeros(N)
    for s, length, hz, glide, db in slides:
        pitch = hz + glide * (CLOCK - s) + waver_hz * wobble(waver_per_s)
        out += amp(db) * swell(s, length, length) * np.sin(2 * np.pi * np.cumsum(pitch) / SR)
    return out


def background(hum_hz=48.8, hum_db=-59, air_db=-64):
    """A fridge compressor hums as a sine under a soft even hiss of coloured noise."""
    # hiss: [f/Hz, level/dB]
    air_spectrum = [(12, -12.5), (20, -4), (53, -12), (66, -11), (76, -16.5), (289, -19), (324, -15.5),
                    (581, -28.5), (705, -21.5), (985, -25), (2470, -34.5), (3960, -36), (6910, -32),
                    (9390, -45), (15500, -66.5)]
    hum = amp(hum_db) * unit(np.sin(2 * np.pi * hum_hz * CLOCK))
    return hum + amp(air_db) * unit(colour(rng.standard_normal(N), air_spectrum))


def scene():
    """Everything reaches both channels alike."""
    mono = beating() + counter_knocks() + lid() + seeds() + jar_put_back()
    mono = mono + fingers() + squeaks() + background()
    return np.array([mono, mono])


def record(dry, threshold_db=-8, slope=0.85, release=75, attack=0.004):
    """Gain control ducks just after a loud peak, recovers at release dB/s; then fast limiter and band limit."""
    level_db = 20 * np.log10(np.abs(dry[0]) + 1e-9)
    excess = slope * np.maximum(level_db - threshold_db, 0)
    held = np.maximum.accumulate(excess + release * CLOCK) - release * CLOCK
    pole = np.exp(-1 / (attack * SR))
    ducked = dry * amp(-signal.lfilter([1 - pole], [1, -pole], held))
    needed = 1 / np.maximum(np.abs(ducked[0]) / .98, 1)
    ducked = ducked * uniform_filter1d(minimum_filter1d(needed, size=45), size=45)
    size = next_fast_len(N + SR // 2)
    passband = np.clip((16000 - np.fft.rfftfreq(size, 1 / SR)) / 700, 0, 1) ** 2  # silent above 16 kHz
    return irfft(rfft(ducked, size) * passband, size)[:, :N]


dry = scene()
out = record(dry)
transcribe(out)
```